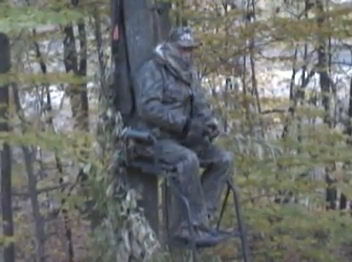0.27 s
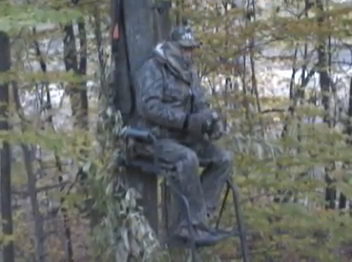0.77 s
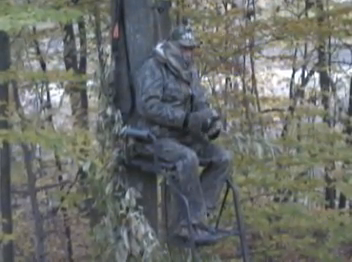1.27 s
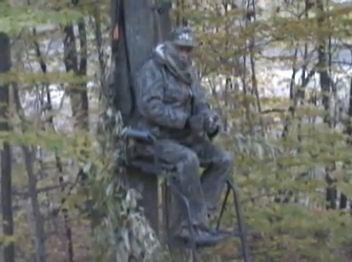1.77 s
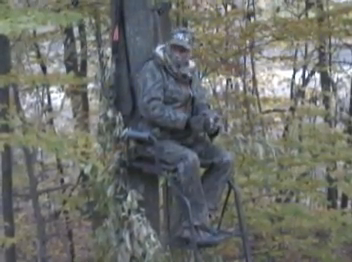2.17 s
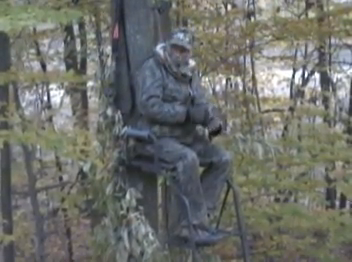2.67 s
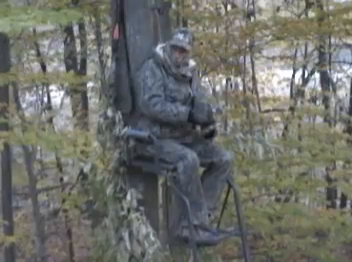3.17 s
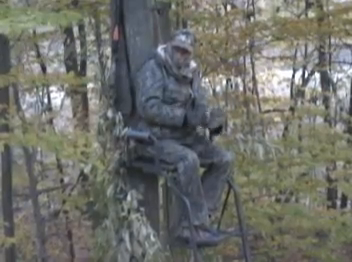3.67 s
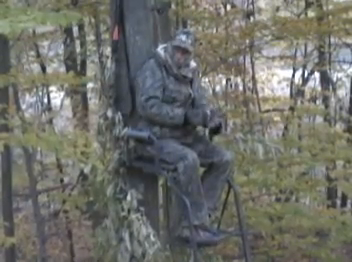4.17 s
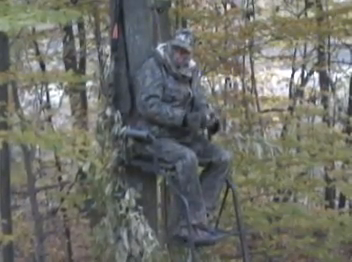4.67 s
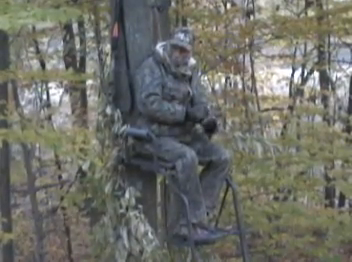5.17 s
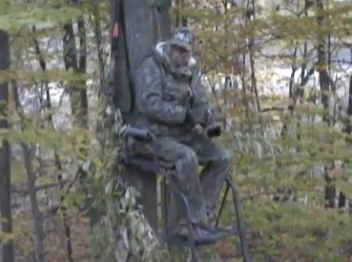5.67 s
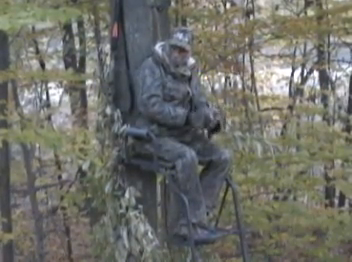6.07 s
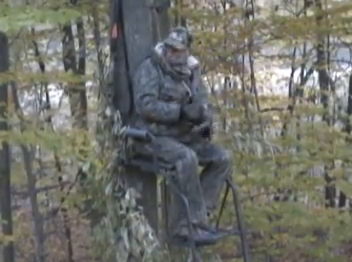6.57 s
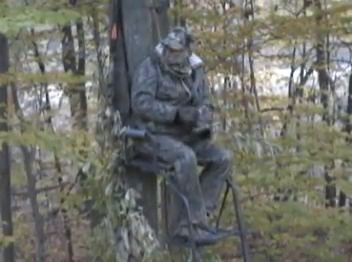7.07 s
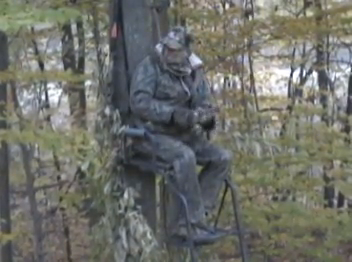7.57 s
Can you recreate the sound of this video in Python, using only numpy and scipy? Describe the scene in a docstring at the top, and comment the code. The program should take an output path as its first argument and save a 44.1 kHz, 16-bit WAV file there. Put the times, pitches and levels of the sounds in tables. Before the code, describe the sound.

Dry, bright cracks of antler on antler, in quick uneven flurries with brief pauses, over faint outdoor air and a distant low drone.

```python
"""Antlers clashing in a wood

Two hard antlers are clashed together in short bunches, a few metres away in an autumn wood.
Each blow is a burst of tiny contacts that rings the bone briefly; trunks scatter it into a hissing tail.
Behind it lie air noise, bands of hiss, low tones, a distant drone and one faint tap, all made by formula.
The recorder bends the loudest peaks and adds fading inverted repeats a few ms apart: a comb of notches."""
import sys
import numpy as np
from scipy import signal
from scipy.fft import rfft, irfft, next_fast_len
from scipy.io import wavfile

SR = 44100
rng = np.random.default_rng(int(sys.argv[2]) if len(sys.argv) > 2 else 0)


def waveform_to_disk(signal):
    """Save audio, clipped to [-1, 1], as 16-bit WAV at the path in sys.argv[1]."""
    frames = np.transpose(np.atleast_2d(signal))
    scaled = np.clip(frames, -1, 1) * 32767
    samples = np.round(scaled).astype(np.int16)
    wavfile.write(sys.argv[1], SR, samples)


N = 345744   # length in samples
LEFT_RIGHT = np.array([[1], [-1]])   # plus at the left port, minus at the right
BLOW_T = np.arange(1024) / SR   # seconds since a blow began
BODY_TOP_HZ = 3200   # modes above this count as treble, those below as body
SOFT_DULLING = 0.46   # treble dB lost per octave for each dB that a blow peaks below 0 dB
POSES = 3   # the antlers move about, so the blows take turns between three different wood echoes
RADIATES_HZ = 1055   # thin tines send out little bass below this
HIGH_RING_HZ, HIGH_RING_OCT = 5430, 0.47   # favoured treble mode: middle pitch and chance spread in octaves
CRACK_DB = 2   # bare click of the contact, against the treble ring
DIRECT_WIDTH_DB = -14   # the treble of a blow reaches the two ports slightly unlike

# Blows of tine on tine: start_s, level_db (peak before the bass cut),
# pitch_hz (strongest low ring), treble_db (treble ring against body ring)
BLOWS = [(0.057, -22, 1210, -13), (0.0787, -14, 1906, -3.5), (0.6718, -35, 1135, -10),
         (0.7262, -14.5, 1070, -10.5), (0.758, 1, 2680, -1.5), (1.3728, -24, 1550, -19),
         (1.398, -16, 2200, 10), (1.4027, -4, 3180, 0.5), (1.4073, 2, 2250, 8), (2.412, -40, 1185, -18),
         (2.423, -38, 1640, -16), (2.474, -10.5, 1970, -7), (2.4907, -2, 1470, -5),
         (2.509, -16.5, 1940, -17), (2.5283, 3, 1700, 2), (2.719, -36, 1690, -17), (2.757, -33, 1780, -17),
         (2.768, -20.5, 1580, -7), (2.7746, -6.5, 2110, -14), (2.7916, 1.5, 1924, -1.5),
         (3.398, -28, 2110, -14), (3.4317, -17, 970, -13), (3.47, -25, 960, -16), (3.5238, -20, 1530, -13),
         (3.5404, -3.5, 1330, -8), (3.579, -19, 1970, -19), (3.5826, -20, 1860, -20),
         (3.5885, -16, 1730, -13), (3.593, -5.5, 1760, -0.5), (3.719, -30.5, 1130, 0),
         (3.73, -21, 1550, -26), (3.75, -32, 1590, -2), (3.767, -31, 1180, 2), (3.804, -14.5, 1640, -2.5),
         (3.821, -3.5, 1480, -4), (3.8322, -1, 1420, 4), (3.9561, -16, 1100, -7), (3.9708, -12, 980, -10),
         (3.9858, -9.5, 1550, -8), (3.9932, -21, 1480, -20), (4.0031, -4, 1570, 0.5), (4.021, -7, 1230, -8),
         (4.035, 0.5, 1980, -1), (4.3136, -29, 1550, -28), (4.3469, -8.5, 1680, -1.5),
         (4.3559, -0.5, 2180, 4), (4.6964, -11.5, 2150, -2.5), (4.7089, 2.5, 1430, 3),
         (4.742, -0.5, 2200, 3), (5.267, -8.5, 1770, -13), (5.2793, 3, 2550, 4), (5.5386, -30, 1430, -18),
         (5.554, -35, 1220, -26), (5.5614, -4.5, 2120, -2.5), (5.574, 5, 1676, 2), (5.985, -18, 1620, -7),
         (5.999, -18.5, 1263, -10), (6.005, -13, 2070, -13), (6.0186, -3.5, 2330, 2),
         (6.2702, -26, 1000, -23), (6.2839, -13.5, 1260, -4.5), (6.3011, -6, 1440, -5),
         (6.3172, -1.5, 1920, -2.5), (6.416, -32.5, 1600, -18), (6.426, -32.5, 1520, -23),
         (6.5281, -17.5, 1420, -13), (6.5491, -7, 1880, -7.5), (6.564, -9, 1930, 13),
         (6.664, -28, 2900, -4), (6.68, -26, 1310, -8), (6.9751, -19.5, 1470, -31), (6.9888, -7, 1420, -1),
         (6.9961, -10, 1920, -14), (7.009, -4.5, 2020, 0), (7.0126, 3.5, 2100, 12),
         (7.228, -11.5, 1470, -9), (7.237, -15, 2220, -12), (7.2454, 3.5, 2360, -1),
         (7.5593, -10, 1420, -5.5), (7.5745, -1, 2850, 5), (7.5851, -7, 1380, -21), (7.606, -1.5, 1660, -1),
         (7.764, -35, 1340, -11), (7.805, -9.5, 1423, -20), (7.8155, -32, 1280, -25),
         (7.825, 4.5, 1920, -0.5)]


def antlers():
    """Contacts excite the bone's modes; returns mid, side and, for each pose, the sound sent all round."""
    size = N + 2048
    mid, side, thuds = np.zeros((3, size))
    poses = np.zeros((POSES, size))
    for k, (start_s, peak_db, low_hz, treble_db) in enumerate(BLOWS):
        weaker_db = min(peak_db, 0)   # blows above 0 dB get no brighter
        high_hz = HIGH_RING_HZ * 2 ** (HIGH_RING_OCT * rng.standard_normal())
        body, top, unlike_top = ring_bone(low_hz, high_hz, weaker_db)
        crack, click = contact_crack(weaker_db)
        bright = amp(treble_db) * (top + amp(CRACK_DB) * crack)
        askew = amp(treble_db + DIRECT_WIDTH_DB) * unlike_top
        low, high, unlike = signal.fftconvolve([body, bright, askew], chatter(peak_db), axes=1)
        blow = np.array([low + high, unlike])
        blow *= amp(peak_db) / np.abs(blow[0]).max()
        # over all directions the chance colour of the chatter evens out: same energy, plain ring
        around = body + amp(treble_db) * (top + amp(CRACK_DB) * click)
        around *= np.linalg.norm(blow[0]) / np.linalg.norm(around)

        i = round(start_s * SR)
        mid[i:i + blow.shape[1]] += blow[0]
        side[i:i + blow.shape[1]] += blow[1]
        poses[k % POSES, i:i + len(BLOW_T)] += around
        thuds[i:i + len(BLOW_T)] += amp(peak_db) * hand_thud()
    bass_cut = signal.butter(4, RADIATES_HZ, "high", fs=SR, output="sos")
    mid, side, *poses = signal.sosfilt(bass_cut, np.vstack([mid, side, poses])[:, :N])
    thuds = thuds[:N]   # the hands' thud escapes the bass cut
    return mid + thuds, side, [around + thuds / np.sqrt(POSES) for around in poses]


RING_S, RING_SLOPE = .034, 1.0   # time to fall 60 dB at 1 kHz, and how fast it shortens with pitch
FREE_RING = .9   # the favoured low mode is held near a node and rings this much longer again
FAVOUR_OCT, SCATTER_DB, DETUNE = .12, 2.0, .012   # how the struck spot picks and shifts its modes
FAVOUR_DB, FAVOUR_HIGH_DB = 8.5, 5.5   # lift of the favoured low and high mode
BODY_DULLING = 0.39   # body dB lost per octave above the favoured low mode for each dB weaker

# Bending modes of the antlers, damped by the hands: pitch_hz (before small shifts),
# level_db (before the struck spot's changes; body and treble are levelled separately afterwards)
BONE = [(960, -13), (1130, 3.5), (1280, 0.5), (1430, 2), (1580, 6), (1750, 1), (1880, 5.5), (2050, 7.5),
        (2250, 5), (2480, 9.5), (2880, 12), (3950, -1.5), (4300, 0), (4900, 0), (5500, 1.5), (6300, 4),
        (7700, 3), (8500, 5.5), (10800, 6), (11800, -6.5), (14500, 5.5)]


def ring_bone(low_hz, high_hz, weaker_db):
    """Dying sine waves, one per bending mode, favouring modes near two pitches; body, top, unlike top."""
    hz, mode_db = np.transpose(BONE)[:, :, None]
    detune, scatter, unlike = rng.standard_normal((3, len(BONE), 1))
    treble = hz > BODY_TOP_HZ
    favoured_hz = np.where(treble, high_hz, low_hz)
    near = np.exp(-(np.log2(hz / favoured_hz) / FAVOUR_OCT) ** 2)
    # softer blows are duller
    dull_db = SOFT_DULLING * weaker_db * np.log2(hz / BODY_TOP_HZ) * treble
    dull_db += BODY_DULLING * weaker_db * np.maximum(np.log2(hz / low_hz), 0) * ~treble
    favour_db = np.where(treble, FAVOUR_HIGH_DB, FAVOUR_DB) * near
    ring_s = RING_S * (1000 / hz) ** RING_SLOPE * (1 + FREE_RING * near * ~treble)
    level_db = mode_db + dull_db + favour_db + SCATTER_DB * scatter - 60 * BLOW_T / ring_s
    # low modes close to the favoured pitch are drawn to it; the grip shifts all modes a little
    pitch = hz * (low_hz / hz) ** (near ** 2 * ~treble) * (1 + DETUNE * detune)
    modes = amp(level_db) * np.sin(2 * np.pi * pitch * BLOW_T)
    groups = [modes * ~treble, modes * treble, modes * treble * unlike]
    return [rms_one(group.sum(axis=0)) for group in groups]


CRACK_S, CRACK_TOP_HZ = 0.0025, 7900   # fading time constant; treble limit at full force


def contact_crack(weaker_db):
    """Bare contact: a noise crack and a single click, duller when the touch is soft."""
    top_hz = CRACK_TOP_HZ * amp(SOFT_DULLING * weaker_db)
    pole = np.exp(-2 * np.pi * top_hz / SR)
    noise = rng.standard_normal(len(BLOW_T)) * np.exp(-BLOW_T / CRACK_S)
    crack, click = signal.lfilter([1], [1, -pole], [noise, BLOW_T == 0])
    return rms_one(crack), rms_one(click)


FIRST_TOUCH, BODY_TOUCH = 7.0, 14.0   # first contact against the chatter, as treble and as heavy body feel it
# fading time constant at 0 dB; softer touches drag on longer; chance spread of that time
CHATTER_MS, CHATTER_MS_PER_DB, CHATTER_SPREAD_DB = 2.47, 0.3, 2.0


def chatter(peak_db):
    """One strong first contact, then tiny random contacts dying out; rows for body, treble, unlike treble."""
    fade_ms = (CHATTER_MS - CHATTER_MS_PER_DB * peak_db) * amp(CHATTER_SPREAD_DB * rng.standard_normal())
    rough = rng.standard_normal(len(BLOW_T))
    # squaring with the sign kept makes a few contacts stand out
    contacts = rough * np.abs(rough) * np.exp(-BLOW_T * 1000 / max(fade_ms, .05))
    contacts = np.tile(contacts, (3, 1))
    contacts[:, 0] = BODY_TOUCH, FIRST_TOUCH, FIRST_TOUCH
    return contacts / np.linalg.norm(contacts, axis=1, keepdims=True)


THUD_HZ, THUD_T60_S, THUD_DB = 466, 0.017, -33.5   # pitch, time to fall 60 dB, start against the blow's peak


def hand_thud():
    """Small thud from the gripping hands: one quickly dying low sine."""
    return amp(THUD_DB - 60 * BLOW_T / THUD_T60_S) * np.sin(2 * np.pi * THUD_HZ * BLOW_T)


WOOD_ONSET_S = 0.0071   # time constant of the echoes' build-up
NEAR_T60_S, NEAR_DB = 0.061, 17   # ground, trunk and body close by answer first and louder

# Scattering by trunks: pitch_hz, t60_s (time for the slow part to fall 60 dB),
# level_db (slow part, per 10 ms of echoes, before the build-up)
WOOD = [(360, 0.056, -11.5), (864, 0.42, -21), (1950, 0.63, -22), (5600, 0.59, -18.5), (10000, 0.46, -15),
        (15300, 0.45, -17)]


def woodland(x):
    """Dense echoes: noise that builds up quickly and dies band by band, fast at first, then slowly."""
    size = SR // 2
    t, tail = np.arange(size) / SR, 0
    noise = rfft(at_ports(np.ones_like, size))
    octave = np.log2(np.fft.rfftfreq(size, 1 / SR) + 1)
    for centre_hz in 250 * 2 ** np.arange(0, 6.5, .5):   # overlapping half-octave steps
        weight = np.clip(1 - 2 * np.abs(octave - np.log2(centre_hz)), 0, 1)
        band = irfft(noise * weight, size)
        slow = amp(-60 * t / at_hz(WOOD, centre_hz, axis=1))
        near = amp(NEAR_DB - 60 * t / NEAR_T60_S)
        tail = tail + band * (slow + near) * amp(at_hz(WOOD, centre_hz, axis=2))
    tail = tail * (1 - np.exp(-t / WOOD_ONSET_S)) / np.sqrt(SR / 100)   # levels are per 10 ms
    return signal.fftconvolve(tail, x[None], axes=1)[:, :N]


TAP_S, TAP_HZ, TAP_WIDTH_HZ = 2.14, 650, 230   # start, pitch and width of the resonance
TAP_T60_S, TAP_DB = 0.1, -45.5   # time to fall 60 dB, starting level


def tap():
    """One faint dull tap in a pause: a puff of noise in one low resonance, dying quickly."""
    t = np.arange(N) / SR - TAP_S
    return amp(TAP_DB - 60 * np.abs(t) / TAP_T60_S) * (t > 0) * narrow(TAP_HZ, TAP_WIDTH_HZ)


# Distant engine-like drone: start_s, pitch_hz, level_db (rms), octave_db (rms of the octave above)
DRONE = [(0, 83.9, -63, -64.5), (1.8, 83.9, -59.5, -68.5), (3, 84.4, -67, -69), (5, 83.3, -66, -80),
         (5.8, 85.76, -63.5, -64.5), (7.84, 85.5, -76, -64.5)]


def drone():
    """A low sine and its octave, gliding slowly in pitch and level."""
    t, out = np.arange(N) / SR, 0
    start_s, pitch_hz, *levels_db = np.transpose(DRONE)
    turns = np.cumsum(np.interp(t, start_s, pitch_hz)) / SR
    for k, level_db in enumerate(levels_db, 1):
        tone = np.sqrt(2) * np.sin(2 * np.pi * k * turns - TONE_LEAD * LEFT_RIGHT)   # right port leads
        out = out + amp(np.interp(t, start_s, level_db)) * waver() * tone
    return out


TONE_LEAD = 0.41   # radians by which low tones run early at one port and late at the other

# Steady low tones: pitch_hz, level_db (rms before the slow waver)
TONES = [(102.4, -65), (108.3, -64), (216.7, -71.5), (325.3, -71.5)]


def low_tones():
    """Sines of steady pitch and slowly wavering level, each from a chance starting phase."""
    t, out = np.arange(N) / SR, 0
    for pitch_hz, level_db in TONES:
        turns = pitch_hz * t + rng.random()
        tone = np.sqrt(2) * np.sin(2 * np.pi * turns + TONE_LEAD * LEFT_RIGHT)   # left port leads
        out = out + amp(level_db) * waver() * tone
    return out


# Narrow bands of hiss: pitch_hz, width_hz, level_db (rms before the slow waver)
HUM = [(343, 44, -70.5), (503, 23, -70), (646, 21, -72), (2980, 500, -66), (6060, 670, -62.5),
       (10800, 1100, -69.5)]


def hiss_bands():
    """Noise squeezed into narrow resonances, each wavering on its own."""
    out = 0
    for pitch_hz, width_hz, level_db in HUM:
        out = out + amp(level_db) * waver() * narrow(pitch_hz, width_hz)
    return out


AIR_DB = -53.5   # rms of the whole air noise before its waver

# Colour of air, leaves and distant rumble: pitch_hz, level_db (per Hz, relative)
AIR = [(25, -24), (55, -24), (110, -13.5), (175, -9), (260, -14), (400, -13), (700, -14), (1000, -14),
       (1300, -21), (2300, -22), (4500, -24), (8000, -22), (12000, -26), (16000, -32.5)]


def air():
    """Broad steady noise shaped by pitch, with half the waver (in dB) of the other layers."""
    noise = at_ports(lambda hz: amp(at_hz(AIR, hz, axis=1)), N)
    return amp(AIR_DB) * rms_one(noise) * np.sqrt(waver())


WAVER_DB, WAVER_HZ = 1.3, 6   # rms size and top speed of the background's unsteadiness


def waver():
    """Slow random gain: smoothed noise drawn at 100 values a second."""
    smooth = signal.butter(2, WAVER_HZ, fs=100, output="sos")
    slow = signal.sosfilt(smooth, rng.standard_normal(N * 100 // SR + 52))
    slow = rms_one(slow[50:])   # skip the filter's start
    return amp(WAVER_DB * np.interp(np.arange(N) * 100 / SR, np.arange(len(slow)), slow))


def narrow(centre_hz, width_hz):
    """Noise in one resonance, rms 1."""
    return rms_one(at_ports(lambda hz: 1 / (1 + (2 * (hz - centre_hz) / width_hz) ** 2), N))


# How the two ports hear scattered sound: pitch_hz, likeness (1 is identical, no unit),
# balance_db (left minus right)
PORTS = [(60, 0.7, 1.5), (300, 0.72, -4), (1440, 0.9, -1), (3200, 0.74, -2), (6650, 0.44, -1),
         (14700, 0.034, -0.2)]


def at_ports(shape, size):
    """Stereo noise of a given amplitude spectrum, as alike and balanced as the two ports hear it."""
    hz = np.fft.rfftfreq(size, 1 / SR)
    mid, side = rfft(rng.standard_normal((2, size)))
    alike = np.clip(at_hz(PORTS, hz, axis=1), 0, 1)
    pair = np.sqrt(1 + alike) * mid + np.sqrt(1 - alike) * side * LEFT_RIGHT
    balance = amp(at_hz(PORTS, hz, axis=2) / 2 * LEFT_RIGHT)
    return irfft(pair * shape(hz) * balance, size)


def at_hz(table, hz, axis):
    """Column of a table read on a log-frequency axis."""
    table = np.array(table)
    return np.interp(np.log(hz + 1), np.log(table[:, 0]), table[:, axis])


def amp(db):
    """dB to gain."""
    return 10 ** (np.asarray(db) / 20)


def rms_one(x):
    """Scale to rms 1."""
    return x / np.sqrt(np.mean(x ** 2) + 1e-20)


DIRECT_PAN_DB = -1.5   # direct blows, left minus right


def scene():
    """Blows at both ports, their scattering and the background."""
    mid, side, poses = antlers()
    direct = (mid + side * LEFT_RIGHT) * amp(DIRECT_PAN_DB / 2 * LEFT_RIGHT)
    scattered = sum(woodland(around) for around in poses)
    background = air() + hiss_bands() + low_tones() + drone()
    return direct + scattered + tap() + background


MIC_TOP_HZ, CUTOFF_HZ = 12500, 16500   # the microphone fades at the top; almost nothing passes the cutoff
BEND, TOP = .036, 1.5   # lopsidedness and ceiling of the overload
COMB_HZ, COMB_FADE_HZ = 149.85, 40000   # spacing of the notches, and how slowly they fade with pitch
COMB_ZERO, COMB_POLE = .92, 0.5   # depth of the notches, and how narrow they are


def record(dry):
    """Lopsided overload adds a low thump to hard blows; then the notch comb and the top cut."""
    heard = signal.sosfilt(signal.butter(2, MIC_TOP_HZ, fs=SR, output="sos"), dry)
    bent = TOP * np.tanh((heard + BEND * heard ** 2) / TOP)
    size = next_fast_len(N + 8192)
    hz = np.fft.rfftfreq(size, 1 / SR)
    delay = np.exp(-2j * np.pi * hz / COMB_HZ - hz / COMB_FADE_HZ)   # notches get shallower in the treble
    comb = (1 - COMB_ZERO * delay) / (1 - COMB_POLE * delay)
    out = irfft(rfft(bent, size) * comb, size)[:, :N]
    return signal.sosfilt(signal.cheby2(16, 75, CUTOFF_HZ, fs=SR, output="sos"), out)


dry = scene()
out = record(dry)
waveform_to_disk(out)
```